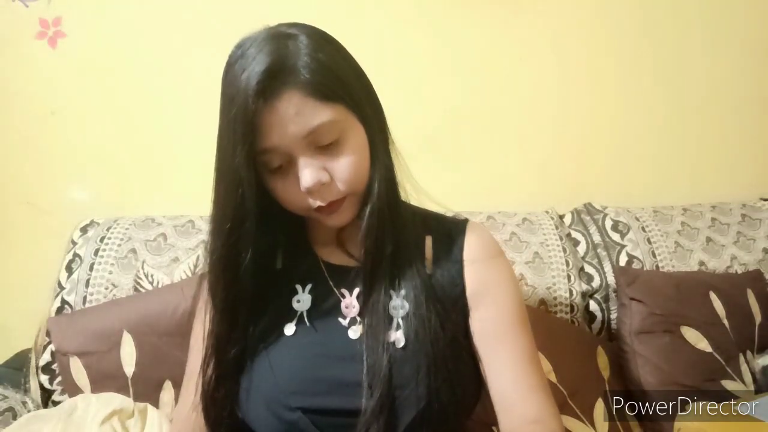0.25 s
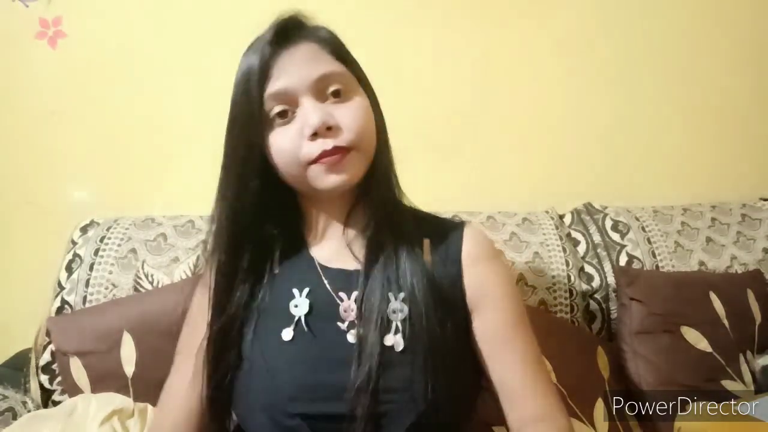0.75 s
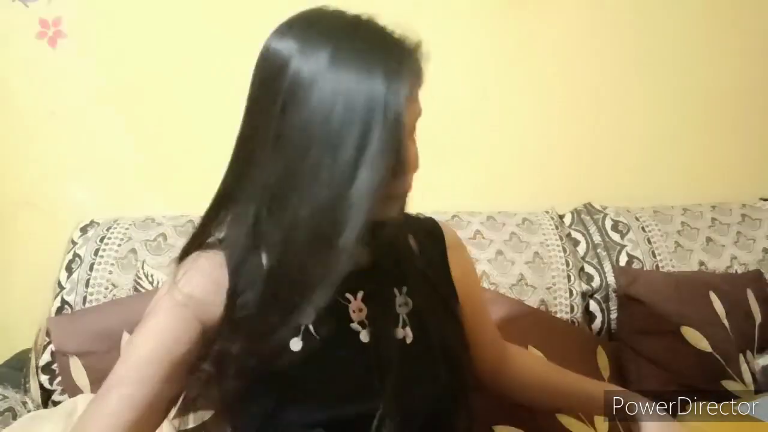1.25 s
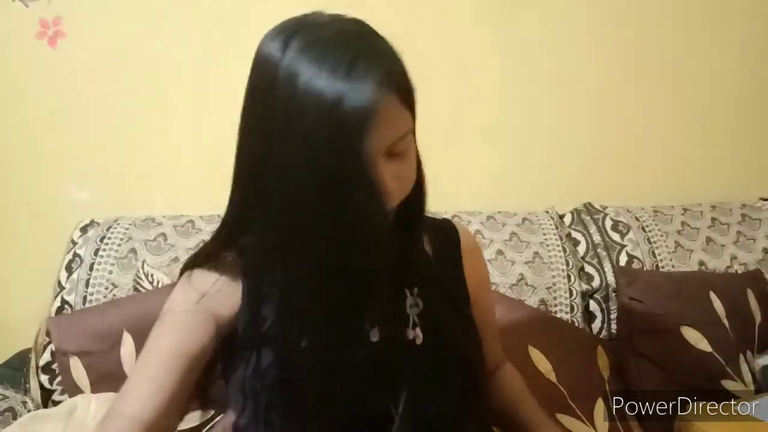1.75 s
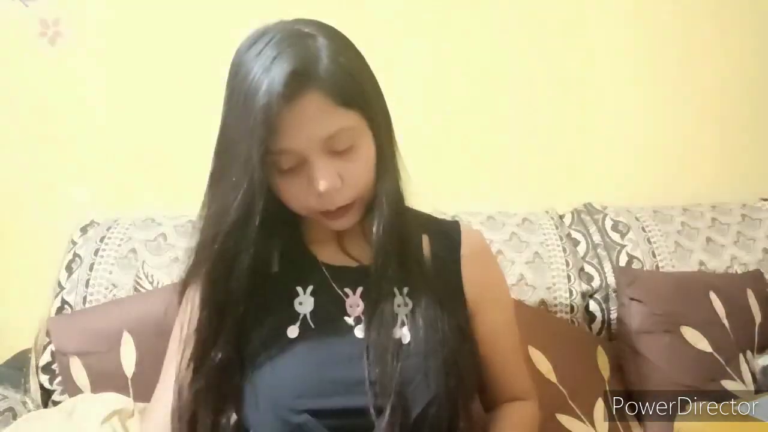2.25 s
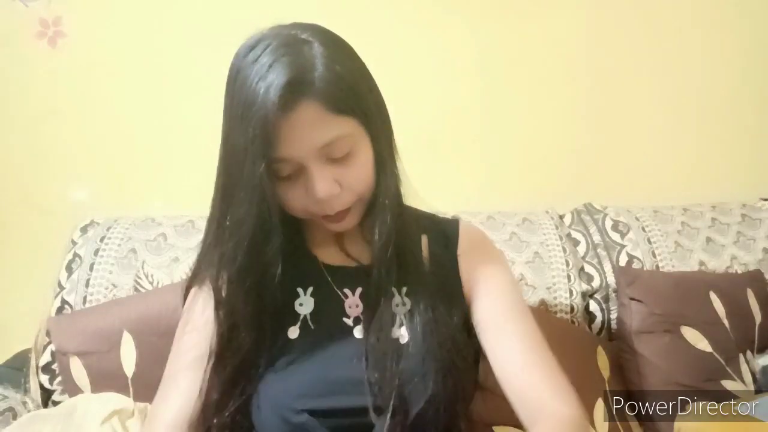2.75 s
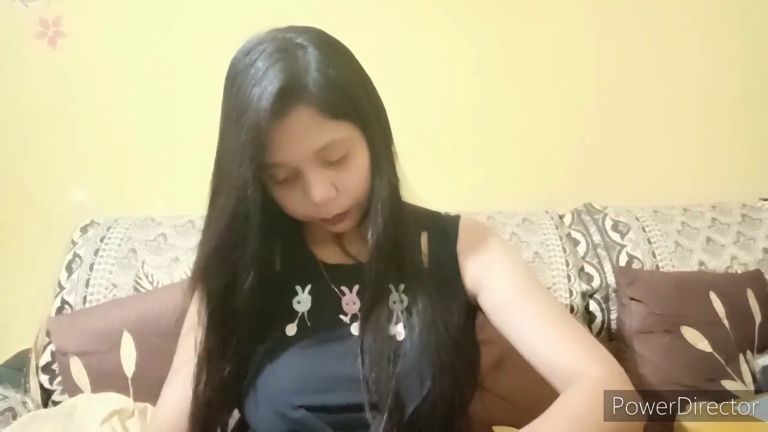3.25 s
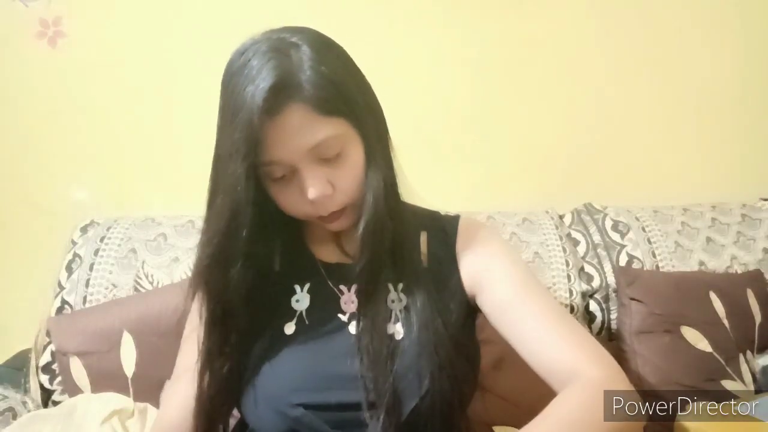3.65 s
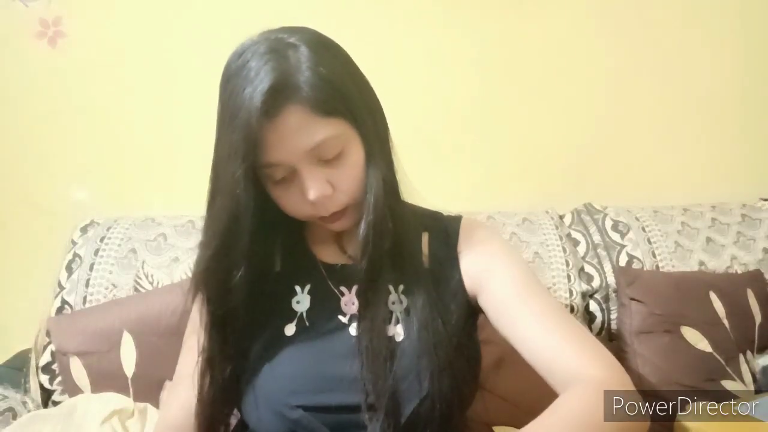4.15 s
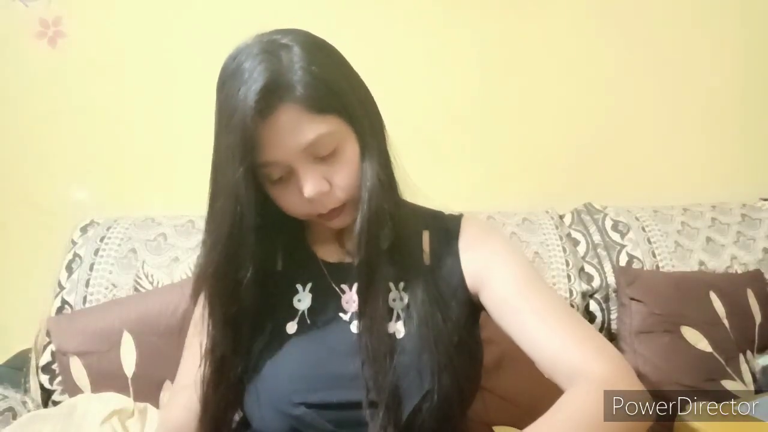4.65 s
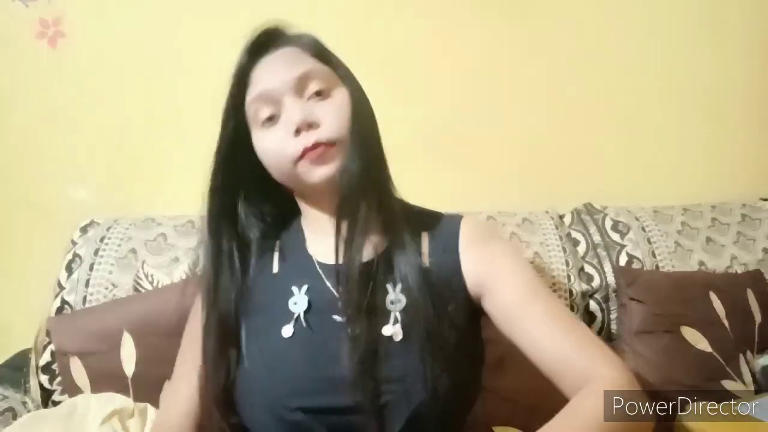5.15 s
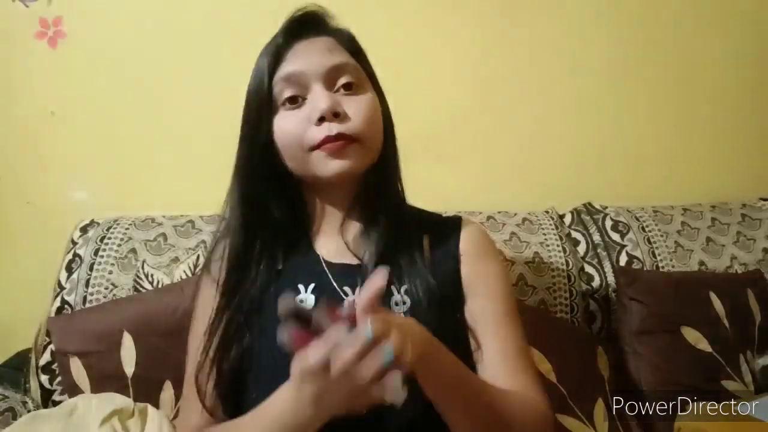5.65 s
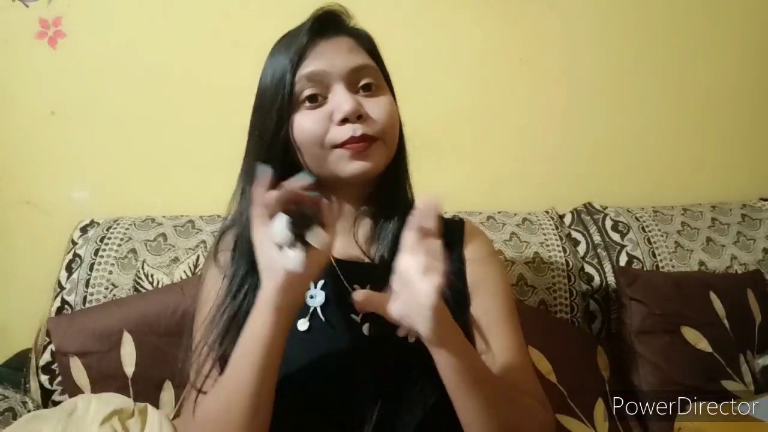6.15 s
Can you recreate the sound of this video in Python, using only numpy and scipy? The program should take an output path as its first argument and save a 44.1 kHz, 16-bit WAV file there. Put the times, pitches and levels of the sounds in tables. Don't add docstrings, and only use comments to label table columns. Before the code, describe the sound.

A steady, broad fan whoosh fills a small room while deep gusts thump the stereo microphone about a metre away. One sharp plastic click comes early, then a pause; from the middle on, light tubes snap, tick and knock in irregular clusters, with short room echoes. Soft hand rubbing hisses near the end.

```python
import sys
import numpy as np
from scipy import signal
from scipy.fft import rfft, irfft, next_fast_len
from scipy.io import wavfile
from scipy.ndimage import uniform_filter1d

SR = 44100
rng = np.random.default_rng(int(sys.argv[2]) if len(sys.argv) > 2 else 0)


def rack_gain(trim_db):
    fader = np.asarray(trim_db, float)
    return 10 ** (fader / 20)


def store_pcm(level_fs):
    pcm = np.round(np.clip(level_fs, -1, 1) * 32767).astype(np.int16)
    wavfile.write(sys.argv[1], SR, np.atleast_2d(pcm).T)


N = 282681


def on_log(table, hz):
    f, v = np.transpose(table)
    return np.interp(np.log(hz + 1), np.log(f), v)


def shape(x, gain):
    size = next_fast_len(x.shape[-1])
    hz = np.arange(size // 2 + 1) * SR / size
    return irfft(rfft(x, size) * gain(hz), size)[..., :x.shape[-1]]


def unit(x):
    return x / np.sqrt(np.mean(x ** 2))


def walk(rate_hz):
    hold = int(SR / rate_hz)
    levels = np.repeat(rng.standard_normal(N // hold + 1), hold)
    slewed = uniform_filter1d(uniform_filter1d(levels, hold), hold)[:N]
    return slewed / slewed.std()


def swells(events, calm_db):
    depth_db = 25
    t = np.arange(N) / SR
    level_db = np.full(N, 1. * calm_db)
    for peak_s, peak_db, swell_s in events:
        level_db = np.maximum(level_db, peak_db - depth_db * np.abs(t - peak_s) / swell_s)
    return rack_gain(level_db)


def fan(right_db=.8, swell_db=.15, flicker_db=.6):
    # pitch_hz, level_db (per Hz)
    blade_noise = [(60, -70.5), (128, -73.5), (222, -49.5), (292, -64), (363, -57.5), (533, -64.5),
                   (781, -65.5), (920, -70), (1027, -71.5), (1145, -66), (1590, -70.5), (2600, -78),
                   (4000, -87), (16000, -92.5)]
    # pitch_hz, width_hz, level_db
    room_modes = [(325, 25, 1.5), (415, 9.5, 0), (609.3, 7.4, 7), (767, 18, 4), (1132, 38, 5.5),
                  (1585, 77, 2.5)]
    # pitch_hz, likeness (0-1)
    coherence = [(100, 1), (300, 0.96), (640, 0.68), (1400, 0.23), (2500, 0.01), (4000, 0)]

    def octave(hz, centre_hz):
        modes_db = sum(db / (1 + ((hz - f) / width) ** 2) for f, width, db in room_modes)
        octaves_off = np.clip(np.log2((hz + 1) / centre_hz), -1, 1)
        return rack_gain(on_log(blade_noise, hz) + modes_db) * np.cos(np.pi / 2 * octaves_off)

    def likeness(hz):
        return np.clip(on_log(coherence, hz), 0, 1)

    out = 0
    swell = walk(1.0)
    for centre_hz in 62.5 * 2. ** np.arange(9):
        mid, side = rng.standard_normal((2, N)) * np.sqrt(SR / 4)
        mid = shape(mid, lambda hz: octave(hz, centre_hz) * np.sqrt(1 + likeness(hz)))
        side = shape(side, lambda hz: octave(hz, centre_hz) * np.sqrt(1 - likeness(hz)))
        ports = np.array([mid + side, rack_gain(right_db) * (mid - side)])
        out = out + rack_gain(swell_db * swell + flicker_db * walk(9)) * ports
    return out


def draught(gusts, calm_db, eddy_db=2.5):
    # pitch_hz, level_db (per Hz)
    rumble = [(15, -10), (40, -3.5), (100, -5.5), (150, -8), (230, -17.5), (320, -52), (600, -43),
              (1200, -91)]
    gain = swells(gusts, calm_db)
    air = rng.standard_normal((2, N))
    deep = shape(air[0], lambda hz: rack_gain(on_log(rumble, hz)))
    deep = deep / np.sqrt(uniform_filter1d(deep ** 2, SR // 20))
    small = unit(shape(air[1], lambda hz: np.exp(-np.log((hz + 1) / 170) ** 2 / .5)))
    return rack_gain(eddy_db * walk(40)) * (gain * deep + rack_gain(0.5) * gain ** 1.75 * small)


def contacts():
    # start_s, crack_db, hollow_db (re crack), shell_hz
    snaps = [(0.5436, -14.5, -13.5, 3500), (2.8493, -33, 2, 3100), (2.8548, -29, -14, 4060),
             (2.8697, -23.5, -12, 6340), (2.877, -25, -3, 6300), (2.915, -31, 4, 3530),
             (2.9407, -23.5, 2.5, 4050), (2.9495, -20.5, -14, 4750), (2.9608, -26, 0, 4530),
             (3.0906, -38, 5, 3570), (3.1441, -24, 0, 4970), (3.1602, -14.5, -9.5, 4740),
             (3.2482, -25, -22, 3750), (3.633, -18.5, -3, 3580), (3.757, -32, 1, 3960),
             (4.3855, -29, -11, 3100), (4.461, -36, -1, 3360), (4.7965, -39, 3, 3550),
             (4.8957, -11, -12, 3650), (5.162, -36, -13, 5680), (5.5219, -26, -10, 4670)]
    # start_s, crack_db, hollow_db (re crack),
    # shell_hz
    ticks = [(2.933, -30, -14, 3500), (3.2526, -30.5, -21, 7560), (3.2648, -27, 4.5, 3570),
             (3.7, -32.5, 4, 2960), (3.7974, -40, 1, 5380), (4.2473, -43, -4, 3100),
             (4.382, -24.5, -1.5, 3370), (4.3904, -31, -4, 3720), (4.6546, -25.5, 0.5, 5650),
             (4.753, -33.5, 6.5, 4930), (5.0857, -37, 4.5, 3560)]
    # start_s, crack_db, hollow_hz
    knocks = [(2.214, -44, 1300), (2.455, -39.5, 1310), (2.7976, -48, 1570), (2.816, -38.5, 1400),
              (2.9024, -39, 1350), (3.2156, -36, 1350), (3.7655, -35, 1550), (4.2587, -45, 1590),
              (4.3624, -39, 1610), (4.545, -40.5, 1410), (5.352, -48, 1380), (5.729, -42, 1580)]
    # start_s, crack_db, hollow_db (re crack), hollow_hz
    caps = [
        (2.4354, -53, 6, 2070),
        (3.6292, -25, -3, 2300),
        (3.6418, -22.5, -1, 2380),
        (3.657, -26, -5, 2050),
        (3.671, -25, -5, 2530),
        (3.7843, -32.5, 7, 2635),
        (3.957, -43.5, 13, 2320),
        (4.6504, -24.5, -12, 2340),
    ]
    # start_s, crack_db, hollow_db, hollow_hz, shell_db, shell_hz
    rows = [(s, db, hollow_db, 1520, -7, shell_hz) for s, db, hollow_db, shell_hz in snaps]
    rows += [(s, db, hollow_db, 1473, 2.5, shell_hz) for s, db, hollow_db, shell_hz in ticks]
    rows += [(s, db, 10.5, hollow_hz, -14, 3700) for s, db, hollow_hz in knocks]
    rows += [(s, db, hollow_db, hollow_hz, -12, 3580) for s, db, hollow_db, hollow_hz in caps]
    return sorted(rows)


def burst(t, lo_hz, hi_hz, peak_s):
    edge = signal.butter(2, [lo_hz, min(hi_hz, .45 * SR)], "band", fs=SR, output="sos")
    swell = t / peak_s * np.exp(1 - t / peak_s)
    spectrum = rfft((rng.standard_normal(len(t)) * swell)[:128])
    grit = irfft(spectrum / np.abs(spectrum))
    grit = np.resize(grit, len(t)) * np.sqrt(swell)
    knock = signal.sosfilt(edge, grit)
    return knock * np.sqrt(np.sum(swell ** 2) / np.sum(knock ** 2))


def ring(t, hz, t60_s):
    return np.sin(2 * np.pi * hz * t) * np.exp(-np.log(1000) * t / t60_s)


def taps(crack_s=0.00067, shell_s=0.00062, hollow_s=0.00084, level_db=0.5):
    # level_db (re knock), t60_s
    ringing = [
        (-2, .035),
        (-3, .016),
    ]
    (hollow_ring_db, hollow_t60_s), (shell_ring_db, shell_t60_s) = ringing
    out = np.zeros(N + 4096)
    t = np.arange(2048) / SR
    for start_s, crack_db, hollow_db, hollow_hz, shell_db, shell_hz in contacts():
        hollow = burst(t, hollow_hz / 2.34, hollow_hz * 1.98, hollow_s)
        hollow = hollow + rack_gain(hollow_ring_db) * ring(t, hollow_hz, hollow_t60_s)
        shell = burst(t, shell_hz / 1.19, shell_hz * 1.13, shell_s)
        shell = shell + rack_gain(shell_ring_db) * ring(t, shell_hz, shell_t60_s)
        crack = burst(t, 5800, 12300, crack_s)
        tap = crack + rack_gain(hollow_db) * hollow + rack_gain(shell_db) * shell
        first = int(start_s * SR)
        out[first:first + len(t)] += rack_gain(crack_db + level_db) * tap
    return shape(out[:N], lambda hz: 1 / (1 + (hz / 16000) ** 4))


def room(lag_s=.00005, build_s=.008):
    # pitch_hz, width_hz, t60_s, level_db
    diffuse = [(700, 3540, 0.066, 1), (2160, 1400, 0.067, -3), (3750, 6600, 0.27, -4),
               (7700, 11000, 0.2, -5), (13800, 2800, 0.13, 3)]
    # delay_s, level_db
    walls = [
        (.0045, -14),
        (0.013, -13),
        (0.02, -20),
    ]
    t = np.arange(SR // 2) / SR
    response = 0
    for centre_hz, width_hz, t60_s, level_db in diffuse:
        noise = rng.standard_normal((2, len(t)))
        band = shape(noise, lambda hz: np.exp(-((hz - centre_hz) / width_hz) ** 2 * 2))
        fade = np.exp(-np.log(1000) * t / t60_s) * (1 - np.exp(-(t / build_s) ** 2))
        response = response + rack_gain(level_db) * band * fade / np.sqrt(np.sum(fade ** 2))
    response[0, 0] += 1
    response[1, int(lag_s * SR)] += 1
    for delay_s, level_db in walls:
        response[[0, 1], int(delay_s * SR) + rng.integers(0, 30, 2)] += rack_gain(level_db)
    return response


def rub(grain_db=1.0):
    # peak_s, level_db, swell_s (to rise and to fade)
    slides = [
        (1.8, -48, 0.19),
        (2.93, -50, .15),
        (6.05, -41.5, 0.32),
    ]
    hiss = shape(rng.standard_normal((2, N)), lambda hz: np.exp(-np.log((hz + 1) / 8000) ** 2 / 1.4))
    return unit(hiss) * swells(slides, -80) * rack_gain(grain_db * walk(30.4))


def scene():
    # peak_s, level_db, swell_s (to rise and to fade)
    gusts_left = [(.52, -31.5, 0.18), (.72, -25, 0.17), (1.16, -31, .045), (1.53, -10.5, 0.073),
                  (1.6, -19, 0.077), (1.84, -16, 0.076), (1.96, -32, .1), (2.05, -24.5, .1),
                  (2.35, -32.5, .09), (2.6, -34, 0.11), (2.72, -26, 0.12), (2.95, -37, .06),
                  (3.04, -25.5, 0.22), (3.57, -22, 0.099), (4.05, -26, 0.13), (4.14, -31, .05),
                  (4.25, -28, .07), (4.57, -15, .17), (4.73, -19.5, 0.18), (5.05, -27, .2),
                  (5.16, -21, 0.075), (5.27, -34, 0.071), (5.4, -25, 0.053), (5.71, -36, 0.24),
                  (5.95, -32, .15), (6.1, -21, 0.037)]
    gusts_right = [(.71, -23, 0.039), (1.19, -9, 0.14), (1.29, -15.5, 0.17), (1.49, -15, 0.14),
                   (1.62, -17, 0.073), (1.71, -23, .11), (1.93, -23, .12), (2.17, -39, .1),
                   (2.28, -36, .06), (2.585, -16, .04), (2.63, -17.5, .15), (2.71, -17.5, 0.075),
                   (2.85, -19.5, 0.16), (3.12, -35, 0.24), (3.51, -31, 0.13), (3.63, -37, 0.041),
                   (3.96, -30.5, 0.062), (4.08, -29, .1), (4.3, -22.5, .17), (4.5, -20.5, 0.11),
                   (4.6, -15.5, 0.23), (4.87, -22.5, 0.18), (5.0, -23.5, 0.1), (5.47, -20, 0.046),
                   (5.69, -22, .04), (5.77, -20, 0.17), (5.96, -18.5, 0.34), (6.14, -22.5, 0.12),
                   (6.36, -28.5, 0.21)]
    clicks = signal.fftconvolve(taps()[None], room(), axes=1)[:, :N]
    wind = np.array([draught(gusts_left, -58), draught(gusts_right, -61)])
    return fan() + clicks + rub() + wind


def top_cut(x):
    return signal.sosfilt(signal.butter(12, 16460, fs=SR, output="sos"), x)


def record(dry, top_hz=15450):
    # pitch_hz, gain_db
    duct_left = [(2000, 1.5), (3800, -3.5), (5300, -4.5), (5900, -7), (6400, -31), (6900, -24), (7400, -31),
                 (8000, -4.5), (9500, 4), (10000, 4), (10600, -3.5), (11500, -5), (12600, -3), (14300, -27)]
    duct_right = [(2000, 1.5), (3300, -1.5), (4300, 1.5), (5900, 3), (6900, 7.5), (7400, 3), (7900, -1.5),
                  (9000, -34), (9900, -44), (11200, -35), (12000, -35), (12600, -2), (13600, -10.5),
                  (15300, -1)]
    left = shape(dry[0], lambda hz: rack_gain(on_log(duct_left, hz) - 22 * (hz > top_hz)))
    right = shape(dry[1], lambda hz: rack_gain(on_log(duct_right, hz) - 22 * (hz > top_hz)))
    mix = np.clip([left, right], -.99, .99)
    return top_cut(mix)


dry = scene()
out = record(dry)
store_pcm(out)
```